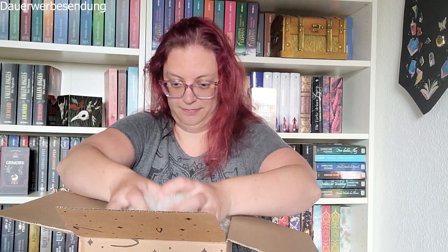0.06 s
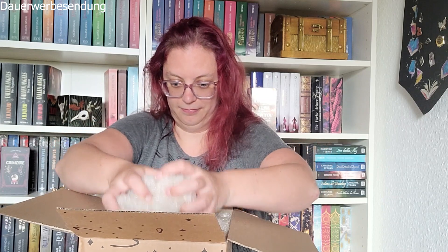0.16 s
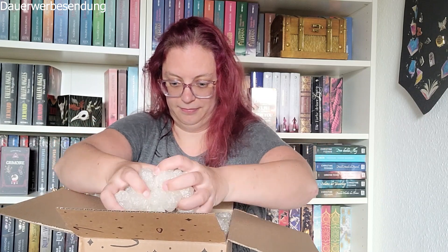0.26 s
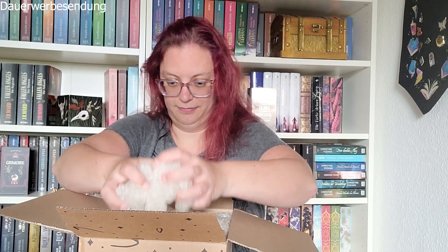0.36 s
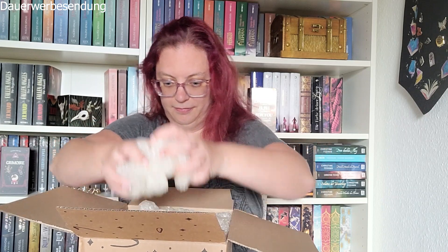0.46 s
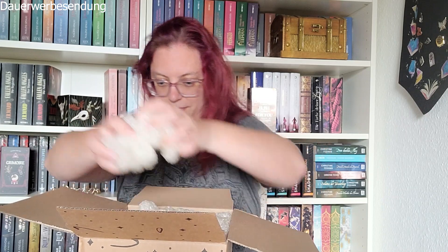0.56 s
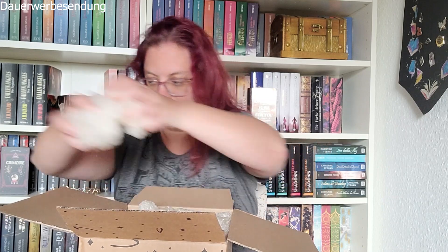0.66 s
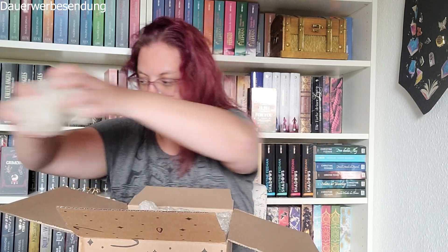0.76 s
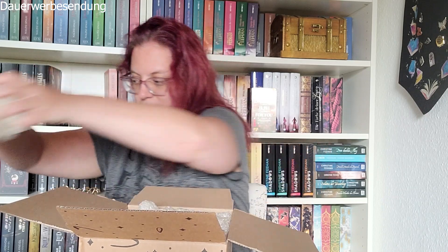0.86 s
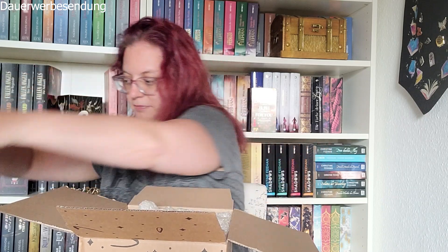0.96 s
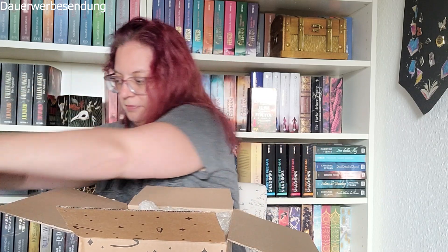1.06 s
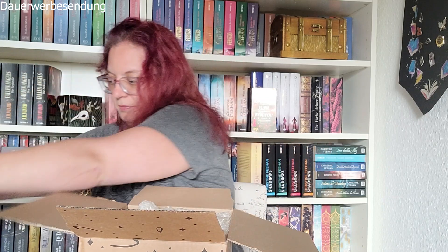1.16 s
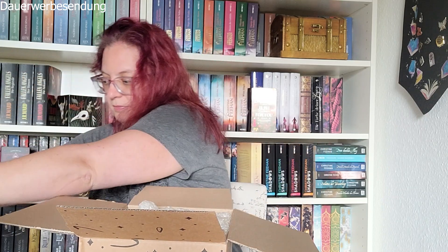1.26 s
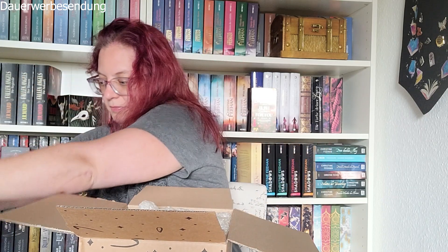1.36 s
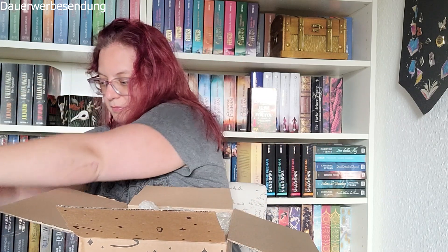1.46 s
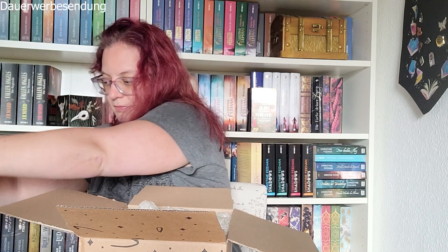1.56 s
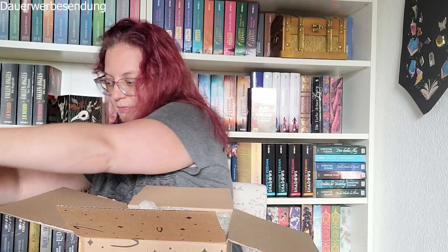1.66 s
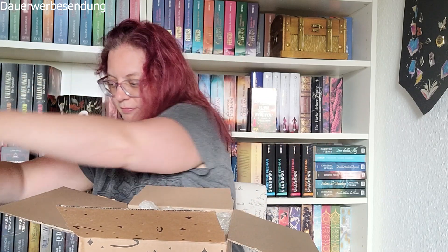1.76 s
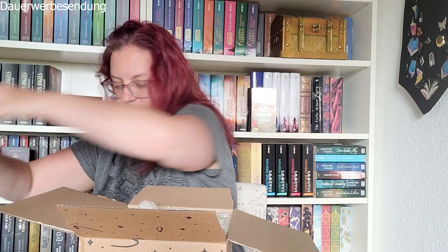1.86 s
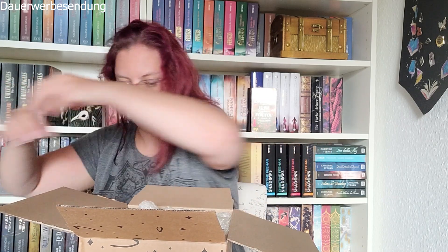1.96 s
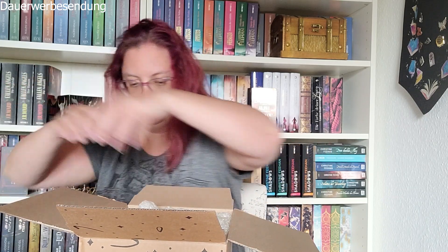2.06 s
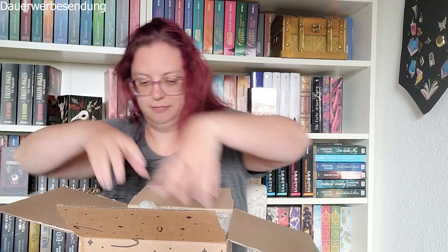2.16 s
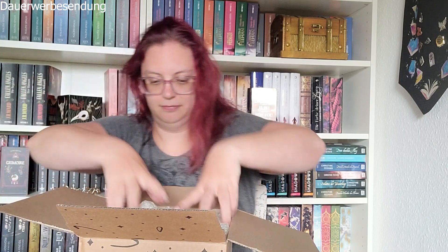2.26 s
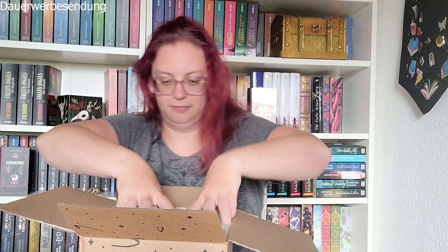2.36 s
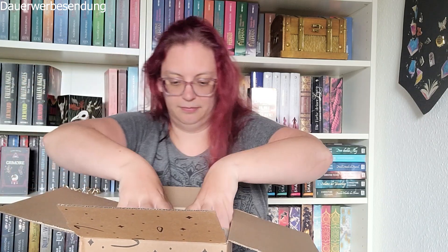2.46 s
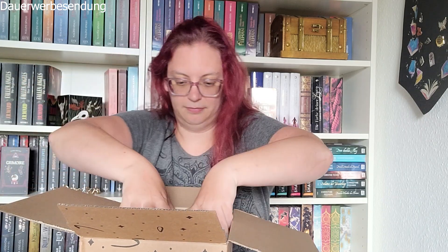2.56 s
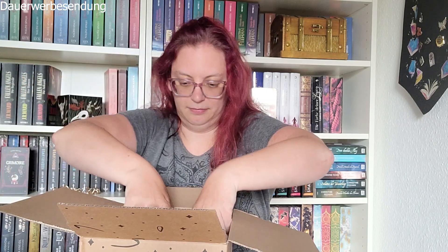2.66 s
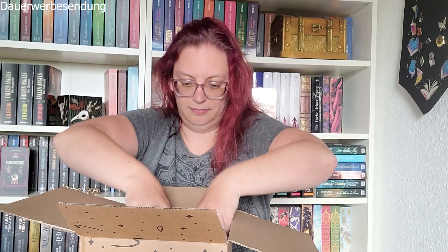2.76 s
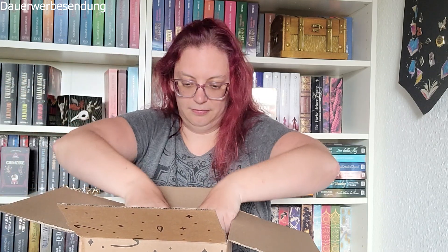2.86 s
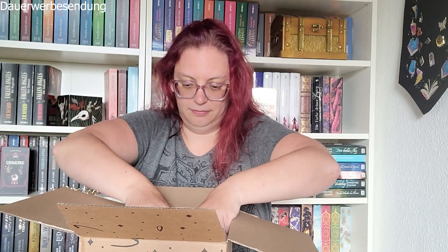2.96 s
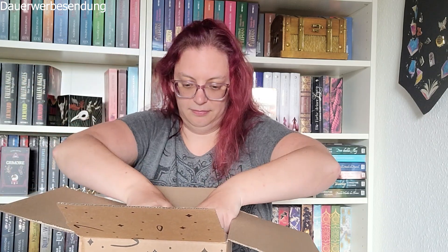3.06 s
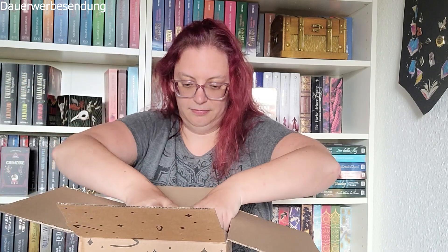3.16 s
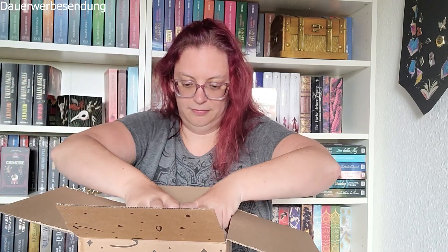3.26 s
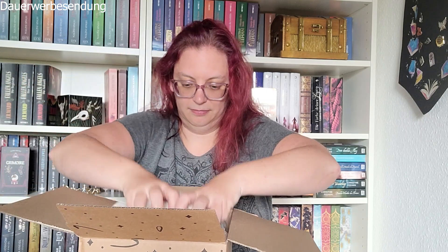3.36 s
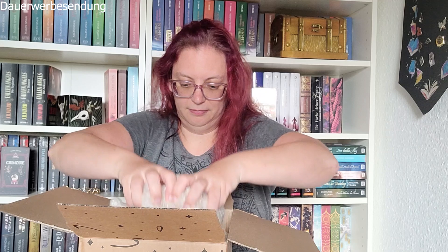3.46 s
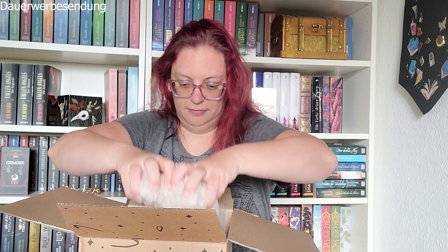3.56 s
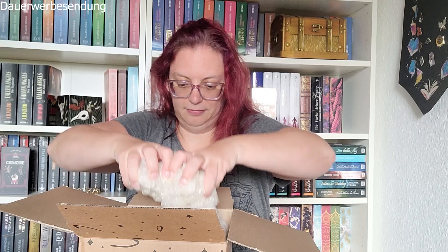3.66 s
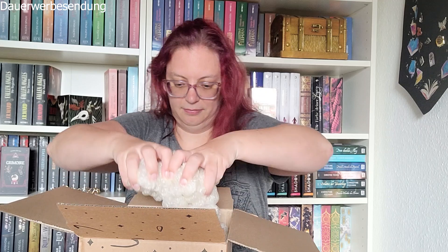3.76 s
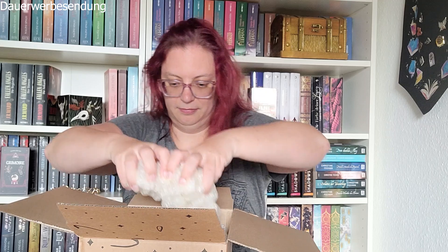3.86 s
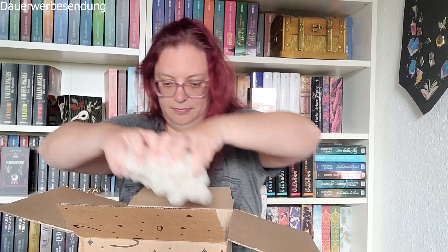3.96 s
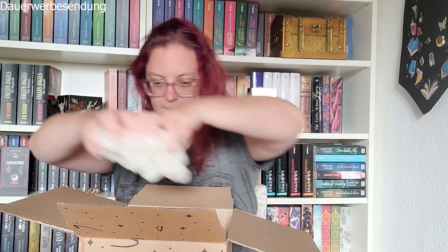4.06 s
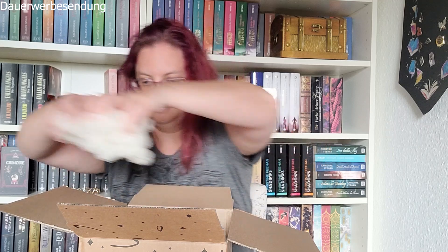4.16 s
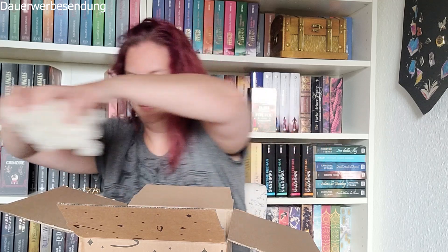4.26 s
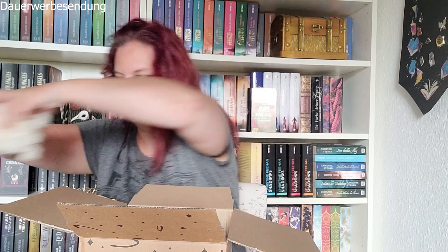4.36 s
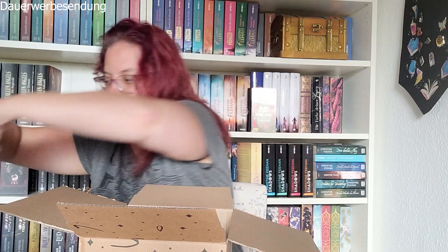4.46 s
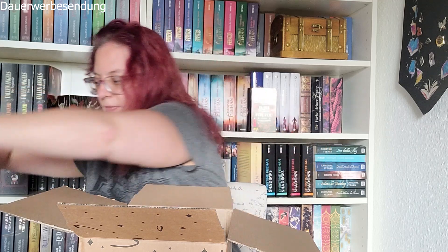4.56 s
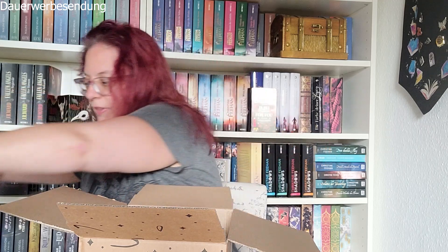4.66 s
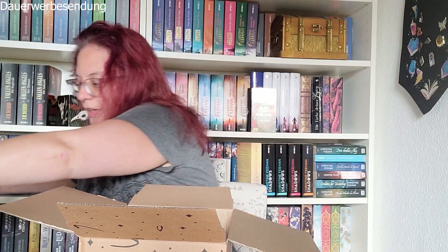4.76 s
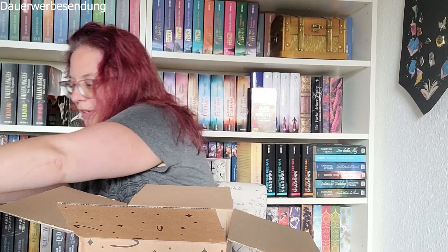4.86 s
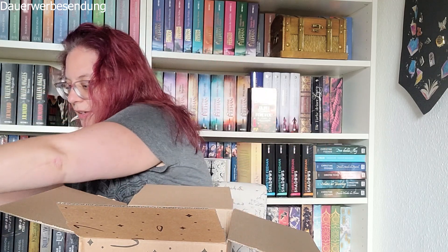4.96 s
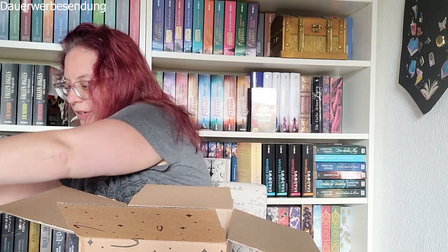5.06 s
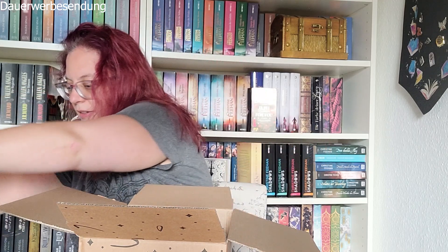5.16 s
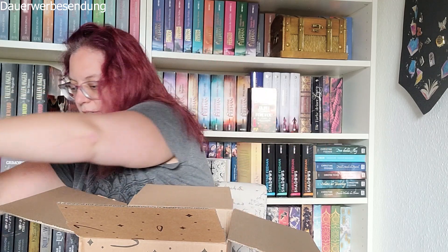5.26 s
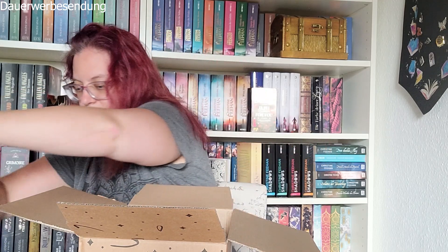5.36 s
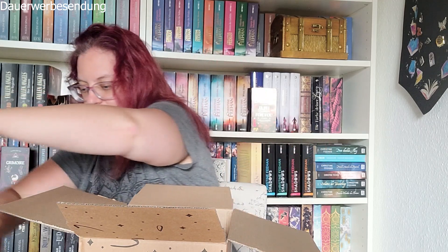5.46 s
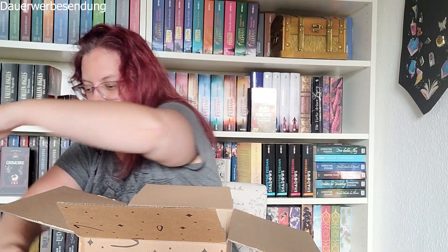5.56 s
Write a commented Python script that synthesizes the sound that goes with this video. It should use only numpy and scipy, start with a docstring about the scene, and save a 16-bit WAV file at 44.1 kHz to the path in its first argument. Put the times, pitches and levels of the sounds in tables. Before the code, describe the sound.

It opens with hands gathering foam packing peanuts in a cardboard box: a close, crisp rustle with dull thuds, thinning after half a second to faint crackles. From about 1 to 1.6 seconds the handful drops into a bin slightly to the left, with a hissy, somewhat hollow patter and small snaps. A few light rustles give way to a brief lull around 2 seconds. At 2.3 seconds the hands dig in again, with dense crunching, tiny squeaks and hollow knocks on the cardboard, loudest between 2.7 and 3 seconds, with another bump at 3.3. From 3.5 seconds the foam crackles softly as it is carried over. A second handful rustles into the bin from about 4.6 to 5.4 seconds, with sharp little snaps and soft bumps, then fades. The room is small and soft, with a faint steady hiss.

```python
"""Foam packing peanuts, scooped by hand from a cardboard box and tipped into a bin at the side.
Foam rubbing on foam gives dense tiny slips, from fine hiss to coarse crunch; single peanuts snap.
The box walls boom under the push, knuckles knock, shoves rumble through the desk.
Small soft room; two spaced microphone ports hear each slip with its own lag."""
import sys
import numpy as np
from scipy import signal
from scipy.fft import rfft, irfft
from scipy.io import wavfile

SR = 44100
rng = np.random.default_rng(int(sys.argv[2]) if len(sys.argv) > 2 else 0)


def wav_out(sig):
    """Save sig, one row per channel (or a flat mono array), as 16-bit PCM at SR to the path in sys.argv[1]."""
    wavfile.write(sys.argv[1], SR, np.round(np.clip(np.atleast_2d(sig).T, -1, 1) * 32767).astype(np.int16))


N = 246959

# foam in the hands: t/s, fine rub level/dB, pressure (squeeze over fine rub)/dB
RUB = [(0.0, -41, 1), (0.04, -43.5, 0), (0.15, -43, -8.5), (0.24, -50, -12), (0.43, -49.5, -15),
       (0.51, -61, -10.5), (0.65, -65, -29), (0.76, -60, -37), (0.81, -60, -8.5), (0.9, -56, -19),
       (0.96, -49.5, -9.5), (1.0, -52, -9), (1.06, -47.5, -11.5), (1.11, -42.5, -8.5), (1.18, -43.5, -9),
       (1.25, -47.5, -11), (1.35, -51, -28.5), (1.5, -47.5, -0.5), (1.58, -53, 2.5), (1.77, -65, -11.5),
       (1.82, -59, -4), (1.92, -65, -34), (2.23, -67.5, -51), (2.28, -55.5, -7.5), (2.34, -59.5, -2),
       (2.39, -45.5, -4), (2.55, -45.5, -4), (2.68, -43, -1.5), (2.89, -40.5, -1), (3.05, -42.5, -2.5),
       (3.35, -46.5, 0), (3.6, -59, -5.5), (3.75, -59, -13), (4.02, -63, -10), (4.15, -61.5, -14),
       (4.21, -68.5, -20), (4.24, -58.5, -15), (4.28, -61, -18.5), (4.33, -62.5, -22.5), (4.39, -56.5, -21),
       (4.49, -60.5, -16), (4.7, -45.5, -7.5), (4.8, -41, -8), (4.92, -49, -16.5), (5.02, -44.5, -6),
       (5.1, -48, -1.5), (5.23, -54.5, -6.5), (5.32, -56, -0.5), (5.49, -60, -26.5), (5.6, -63, -23.5)]
# slip classes: low f/Hz, high f/Hz, slips/s, size spread/dB, t60/cycles, clumping/dB
FINE = (5280, 15430, 16100, 0.45, 7.1, 1.16)
CRUNCH = (2520, 4800, 8700, 0.92, 2.24, 1.16)
SQUEEZE = (895, 2520, 3940, 2.4, 5.6, 3.1)
THUD = (118.4, 323, 1700, 3.05, 7.5, 0.74)
# spectrum of each slip class: f/Hz, relative density/dB
FINE_COLOUR = [(2940, -30), (5000, -8), (5970, -12), (7660, 5.5), (9270, -22), (11900, 4), (15100, -16),
               (15700, -11.5)]
CRUNCH_COLOUR = [(2200, -5), (3400, -12), (5500, 2)]
SQUEEZE_COLOUR = [(800, -26), (1050, 1.5), (1320, -5.5), (1600, 3.5), (2200, -3.5)]
THUD_COLOUR = [(120, 0.5), (200, -8), (330, -1)]
# single peanuts snapping: t/s, peak level/dB, f/Hz, t60/cycles
SNAPS = [(.561, -47, 4300, 4), (.714, -49, 4600, 4), (.7914, -44, 5300, 3), (.9641, -30, 5470, 8),
         (.9648, -34, 11500, 7), (1.079, -32, 3800, 6), (1.1558, -27, 3100, 6), (1.180, -33, 3300, 5),
         (1.270, -37, 3300, 6), (1.7995, -43, 6900, 3), (2.2682, -45, 4600, 3), (2.644, -27, 2600, 3),
         (2.7518, -24, 2500, 3), (2.969, -27, 3000, 3), (3.3894, -33, 2600, 3), (3.6711, -43, 11000, 6),
         (3.7203, -45, 3500, 3), (3.8592, -47, 5600, 3), (3.901, -45, 12000, 8), (3.9783, -48, 5800, 3),
         (4.0362, -46, 5300, 5), (4.0479, -37, 5000, 7), (4.0857, -43, 10000, 5), (4.2267, -38, 12500, 9),
         (4.2652, -38.5, 7880, 14), (4.3724, -46, 3700, 3), (4.7605, -30, 3300, 6), (4.8073, -29, 7600, 5),
         (4.8257, -29, 3400, 5), (4.9958, -27, 7400, 4), (5.3203, -41, 11900, 8)]
# short bursts of foam hiss and crunch: t/s, level/dB, f/Hz, width/Hz, t60/s
BURSTS = [(0.158, -44, 2200, 1500, 0.09), (0.712, -56, 5080, 3000, 0.2), (0.79, -50.5, 5100, 7970, 0.29),
          (0.919, -52, 3600, 4000, 0.54), (0.953, -49, 5400, 2000, 0.13), (1.175, -37.5, 7300, 2500, 0.055),
          (1.799, -50, 4000, 9000, 0.13), (1.986, -71, 1480, 690, .3), (2.360, -50, 3000, 8000, .2),
          (2.746, -40, 2500, 4000, .15), (2.9, -39.5, 3000, 5000, .15), (3.305, -44, 2500, 4000, .2),
          (3.516, -41.5, 3000, 5140, 0.12), (3.858, -54, 4940, 6000, 0.13), (4.050, -57, 5000, 4020, .1),
          (4.271, -72, 7950, 1520, 0.098), (4.371, -55.5, 2660, 4830, 0.63), (4.991, -47, 5000, 9000, 0.14)]
# hand position: t/s, reach (0 box, 1 bin)
REACH = [(0, 0.027), (.6, 0.17), (1.05, 0.91), (2.0, 0.97), (2.3, 0.11), (3.9, 0.0072), (4.5, .7),
         (4.8, 0.98), (5.6, 0.96)]
# pours into the bin: start t/s, length/s, hollowness (0-1)
POURS = [(1.02, .27, 0.74), (4.63, 0.23, 0.64), (4.944, 0.43, 0.1)]
# bin resonances: f/Hz, width/Hz
BIN_BANDS = [(3300, 3500), (7500, 720)]
# cardboard box modes: f/Hz, level/dB, t60/s
BOX_MODES = [(141.5, 0, 0.11), (212, -32, 0.054), (282, 3, 0.02), (372, 4.5, 0.033), (456.7, 6, 0.036),
             (560, 4, 0.029), (646.6, -0.5, 0.045), (733, -4.5, 0.046), (876, 1.5, 0.014)]
# peanuts pushed against the walls: t/s, level/dB
WALL_PUSH = [(0.0, -46), (0.04, -40.5), (0.33, -62.5), (0.58, -83), (0.9, -94.5), (1.17, -58.5),
             (1.36, -76), (1.47, -50.5), (1.67, -71), (1.92, -91), (2.24, -89), (2.34, -49), (2.51, -47),
             (2.78, -37), (3.07, -42), (3.31, -42), (3.55, -57), (3.9, -77), (4.3, -93.5), (4.62, -93),
             (4.7, -70), (4.79, -61.5), (4.92, -78), (5.01, -48.5), (5.24, -68), (5.6, -88)]
# hand or arm shoves: peak t/s, wall level/dB, thud level/dB, desk level/dB, fade/(dB/s)
SHOVES = [(0.0, -53, -39, -67, 135), (0.2, -58, -47, -74, 147), (0.29, -65, -60, -78, 200),
          (0.389, -55.5, -62, -76, 150), (1.279, -70, -53.5, -65, 168), (1.42, -70, -74, -71, 100),
          (1.51, -67, -49.5, -68, 168), (1.62, -59, -68, -67, 150), (1.81, -70, -74, -85, 202),
          (2.282, -47.5, -48, -63, 198), (2.38, -40, -49, -80, 150), (2.42, -44.5, -41.5, -69, 172),
          (2.68, -49, -43, -62, 150), (2.752, -33, -30.5, -64, 252), (2.912, -33, -36, -72, 302),
          (2.978, -41, -34.5, -55, 300), (3.32, -51, -44, -73, 106), (3.65, -47.5, -74, -95, 300),
          (3.768, -56, -86, -84, 163), (3.941, -68, -52.5, -70, 194), (4.06, -69, -77, -88, 158.5),
          (4.92, -85, -75, -73, 102), (5.08, -62, -57.5, -73, 96), (5.14, -83, -78, -64, 150),
          (5.28, -59, -67, -77, 130.5)]
# knuckles and falling peanuts on the box: t/s, peak level/dB
KNOCKS = [(0.106, -48), (0.25, -58), (2.269, -43), (2.361, -29.5), (2.418, -38), (2.595, -53), (2.644, -25),
          (2.682, -23.5), (2.749, -19), (2.774, -27), (2.91, -26), (2.97, -15), (3.325, -26), (3.646, -46),
          (3.676, -52), (3.716, -36.5), (3.808, -56.5)]
# desk rumble: f/Hz, relative density/dB
DESK_COLOUR = [(15, -25), (30, -18), (60, -4), (90, -6.5), (125, -5), (170, -29), (300, -70)]
# room tone and microphone hiss: f/Hz, relative density/dB
AIR_COLOUR = [(13, -30), (22, 11), (66, 2), (193, -1), (268, 5.5), (703, -15), (1220, -3.5), (2050, -15),
              (2290, -22), (4810, 11), (6170, -10.5), (7680, 9), (9060, -7), (12300, 5), (15700, 0)]

# pairs: (at box, at bin)
CRUNCH_OVER_FINE_DB, LEFT_LAG_MS, LEFT_OVER_RIGHT_DB = (2.5, 1.5), (0.02, 0.26), (-1, -2)
LAG_SPREAD_MS, SHOVE_RISE_DB_PER_S = 0.11, 700.5
WALL_CLUMP_DB, KNOCK_SOFT_HZ, BASS_CUT_HZ = 1.5, 900, 168
THUD_RE_PUSH_DB, DESK_RE_PUSH_DB, DESK_FLOOR_DB, AIR_DB = -10, -29.5, -86.5, -66
ROOM_T60_S, ROOM_DB, ROOM_CUT_HZ, ROOM_ALIKE_HZ, ROOM_CHANGE_S = 0.18, -3, 930, 800, 0.25
PORT_DIP_HZ, PORT_DIP_WIDTH_HZ, PORT_DIP_DEPTH, CUTOFF_HZ = 9000, 660, 0.33, 15720


def rubbing():
    """Foam on foam: fine hiss, crunch and squeeze; pours bring out the bin's resonances."""
    fine_db, pressure_db = in_time(RUB)
    hollowness = pouring()
    crunch_db = fine_db + at_reach(CRUNCH_OVER_FINE_DB) + 0.33 * pressure_db
    crunch = foam(CRUNCH, crunch_db, CRUNCH_COLOUR)
    crunch = in_bin(crunch, BIN_BANDS[0], boost_db=5, share=hollowness)
    fine = foam(FINE, fine_db, FINE_COLOUR)
    fine = fine + hollowness * 0.41 * resonance(fine, *BIN_BANDS[1])
    return fine + crunch + foam(SQUEEZE, fine_db + pressure_db, SQUEEZE_COLOUR)


def foam(slip_class, level_db, colour, pitches=20):
    """Each slip rings a few cycles at one of many pitches; the level wavers in clumps."""
    low_hz, high_hz, per_s, spread_db, cycles, clump_db = slip_class
    at, sizes, places = slips(per_s, spread_db)
    pitch, out = rng.integers(0, pitches, N)[at], 0
    for k, hz in enumerate(np.geomspace(low_hz, high_hz, pitches)):
        mine = pitch == k
        clicks = at_ports(at[mine], sizes[mine], places[mine])
        weight = np.sqrt(hz) * from_db(at_hz(colour, hz))   # offsets the wider spacing up high
        out = out + weight * rms_one(ring(clicks, hz, cycles / hz))
    band = butter(out, 3, [low_hz * 0.66, min(high_hz * 1.355, 19000)], "band")
    return from_db(level_db + clump_db * drift(rate_hz=35)) * rms_one(band)


def slips(per_s, spread_db):
    """Random slips: sample index, signed size, place in the heap."""
    at = np.flatnonzero(rng.random(N) < per_s / SR)
    sizes = from_db(spread_db * np.minimum(rng.exponential(1, N), 4)) * rng.choice([-1, 1], N)
    return at, sizes[at], rng.standard_normal(N)[at]


def snaps():
    """Short squeaks: a click rung twice swells, then dies in a few cycles."""
    out, span = np.zeros((2, N)), 400
    for (t_s, db, hz, cycles), lag in zip(SNAPS, rng.integers(0, 2, len(SNAPS))):
        at = round(t_s * SR)
        squeak = ring(ring(np.arange(span) == 0, hz, cycles / hz), hz, cycles / hz)
        squeak = np.diff(squeak, prepend=0)   # a tiny body radiates no bass
        squeak = from_db(db) * squeak / np.abs(squeak).max()
        out[0, at + lag:at + lag + span] += squeak
        out[1, at:at + span] += squeak
    return out


def bursts():
    """Short bursts of foam hiss and crunch that start at once and die away."""
    out, span = np.zeros((2, N)), 12000
    for t_s, db, hz, width_hz, t60_s in BURSTS:
        at = round(t_s * SR)
        noise = rng.standard_normal((2, span))
        hiss = rms_one(resonance(resonance(noise, hz, width_hz), hz, width_hz))
        out[:, at:at + span] += hiss * from_db(db - 60 * np.arange(span) / SR / t60_s)
    return out


def pouring():
    """Hollowness swells and sinks with each pour."""
    t_s = np.arange(N) / SR
    return sum(hollowness * np.sin(np.pi * np.clip((t_s - start_s) / length_s, 0, 1))
               for start_s, length_s, hollowness in POURS)


def in_bin(x, band, boost_db, share):
    """A share of the sound passes through the bin's resonance."""
    share = np.clip(share, 0, 1)
    return (1 - share) * x + share * from_db(boost_db) * resonance(resonance(x, *band), *band)


def box(push_db):
    """Thud, wall boom and knocks; small walls radiate no deep bass."""
    thud_db = summed_db(push_db + THUD_RE_PUSH_DB, shove_db(column=2))
    thud = foam(THUD, thud_db, THUD_COLOUR, pitches=8)
    walls = box_walls(summed_db(push_db, shove_db(column=1)))
    return butter(thud + walls + knocks(), 4, BASS_CUT_HZ, "high")


def box_walls(level_db):
    """Peanuts patter on the cardboard and feed all but its two lowest modes."""
    patter = at_ports(*slips(per_s=1200, spread_db=2.5))
    body = sum(from_db(db) * ring(patter, hz, t60_s) * (-1) ** k
               for k, (hz, db, t60_s) in enumerate(BOX_MODES[2:]))
    return from_db(level_db + WALL_CLUMP_DB * drift(rate_hz=50)) * rms_one(body)


def knocks():
    """A soft blow strikes every box mode, each with a random strength."""
    out, span = np.zeros((2, N)), 5000
    blow = butter(np.arange(span) == 0, 2, KNOCK_SOFT_HZ, "low")
    for t_s, peak_db in KNOCKS:
        at = round(t_s * SR)
        knock = sum(from_db(rng.normal(db, 3)) * ring(blow, hz, t60_s) for hz, db, t60_s in BOX_MODES)
        out[:, at:at + span] += from_db(peak_db) * knock / np.abs(knock).max()
    return out


def shove_db(column):
    """Each shove rises fast to its peak and fades at its own pace."""
    levels_db = []
    for shove in SHOVES:
        age_s = np.arange(N) / SR - shove[0]
        levels_db.append(shove[column] - np.maximum(-age_s * SHOVE_RISE_DB_PER_S, age_s * shove[-1]))
    return summed_db(*levels_db)


def desk_rumble(push_db):
    """Pushes and shoves carry through the desk as low noise."""
    level_db = summed_db(DESK_FLOOR_DB, push_db + DESK_RE_PUSH_DB, shove_db(column=3))
    return from_db(level_db) * stereo_noise(DESK_COLOUR, alike_hz=92.3)


def room(x):
    """Echoes: a dying noise tail, thin in the bass, redrawn at intervals for the moving hands."""
    t_s, step = np.arange(round(0.4 * SR)) / SR, round(ROOM_CHANGE_S * SR)
    decay = from_db(-60 * t_s / ROOM_T60_S) * (t_s > 0.002)
    out, fade = np.zeros((2, N + 4 * step + len(t_s))), np.hanning(2 * step)
    x = np.pad(x, ((0, 0), (step, 2 * step)))
    for at in range(0, N + step, step):
        mid, side = rng.standard_normal((2, len(t_s))) * decay
        side = butter(side, 1, ROOM_ALIKE_HZ, "high")   # long waves reach both ports alike
        tail = butter([mid + side, mid - side], 1, ROOM_CUT_HZ, "high")
        tail = tail / np.sqrt(np.sum(tail ** 2, axis=1, keepdims=True))
        wet = signal.fftconvolve(x[:, at:at + 2 * step] * fade, tail, axes=1)
        out[:, at:at + wet.shape[1]] += wet
    return from_db(ROOM_DB) * out[:, step:step + N]


def air():
    """Steady room tone and microphone hiss."""
    return from_db(AIR_DB) * stereo_noise(AIR_COLOUR, alike_hz=400)


def stereo_noise(colour, alike_hz):
    """Noise of rms 1; the ports agree below alike_hz."""
    hz = np.maximum(np.fft.rfftfreq(N, 1 / SR), 5)
    mid, side = rfft(rng.standard_normal((2, N))) * from_db(at_hz(colour, hz))
    alike = 1 / (1 + (hz / alike_hz) ** 2)
    return rms_one(irfft(np.sqrt(1 + alike) * mid + np.sqrt(1 - alike) * side * [[1], [-1]], N))


def at_ports(at, sizes, places):
    """Clicks at both ports; reach and place in the heap set each lag."""
    lag_ms = at_reach(LEFT_LAG_MS)[at] + LAG_SPREAD_MS * places
    lag = np.round(lag_ms * SR / 1000).astype(int)
    return np.array([np.bincount(np.clip(i, 0, N - 1), sizes, N) for i in (at + lag, at)])


def at_reach(ends):
    """Value between its box and bin ends, following the hands."""
    return ends[0] + (ends[1] - ends[0]) * in_time(REACH)[0]


def ring(clicks, hz, t60_s):
    """A unit click starts a dying sine of height 1."""
    r, w = from_db(-60 / (t60_s * SR)), 2 * np.pi * hz / SR
    return signal.lfilter([0, np.sin(w)], [1, -2 * r * np.cos(w), r * r], clicks + 1e-18)


def resonance(x, hz, width_hz):
    """Band-pass, peak gain 1."""
    return signal.lfilter(*signal.iirpeak(hz, hz / width_hz, fs=SR), x)


def butter(x, order, hz, kind):
    """Maximally flat filter."""
    return signal.sosfilt(signal.butter(order, hz, kind, fs=SR, output="sos"), x)


def drift(rate_hz):
    """Slow random wander, rms 1."""
    hop = 40
    r = np.exp(-2 * np.pi * rate_hz * hop / SR)
    slow = signal.lfilter([1], [1, -2 * r, r * r], rng.standard_normal(N // hop + 2002))[2000:]
    return np.interp(np.arange(N) / hop, np.arange(len(slow)), rms_one(slow))


def in_time(rows):
    """Table columns at every sample."""
    t_s, *columns = np.transpose(rows)
    return [np.interp(np.arange(N) / SR, t_s, column) for column in columns]


def at_hz(colour, hz):
    """Spectrum level on a log-frequency axis."""
    points_hz, levels_db = np.transpose(colour)
    return np.interp(np.log(hz), np.log(points_hz), levels_db)


def summed_db(*levels_db):
    """Power sum of levels."""
    return 10 * np.log10(sum(from_db(db) ** 2 for db in levels_db))


def from_db(db):
    """Level to gain."""
    return 10 ** (np.asarray(db) / 20)


def rms_one(x):
    """Scale to rms 1."""
    return x / np.sqrt(np.mean(x ** 2) + 1e-20)


def scene():
    """Foam and box in the room, panned with the hands, over rumble and room tone."""
    push_db, = in_time(WALL_PUSH)
    near = rubbing() + snaps() + bursts() + box(push_db)
    background = desk_rumble(push_db) + air()
    pan = from_db(np.outer([0.5, -0.5], at_reach(LEFT_OVER_RIGHT_DB)))
    return (near + room(near)) * pan + background


def record(dry):
    """The port cavity dips one band; the top is cut steeply."""
    heard = dry - PORT_DIP_DEPTH * resonance(dry, PORT_DIP_HZ, PORT_DIP_WIDTH_HZ)
    return signal.sosfilt(signal.ellip(14, 0.5, 85, CUTOFF_HZ, fs=SR, output="sos"), heard)


dry = scene()
out = record(dry)
wav_out(out)
```